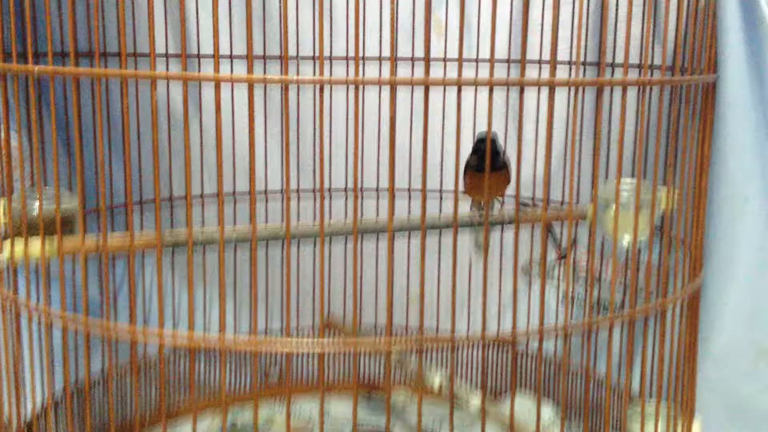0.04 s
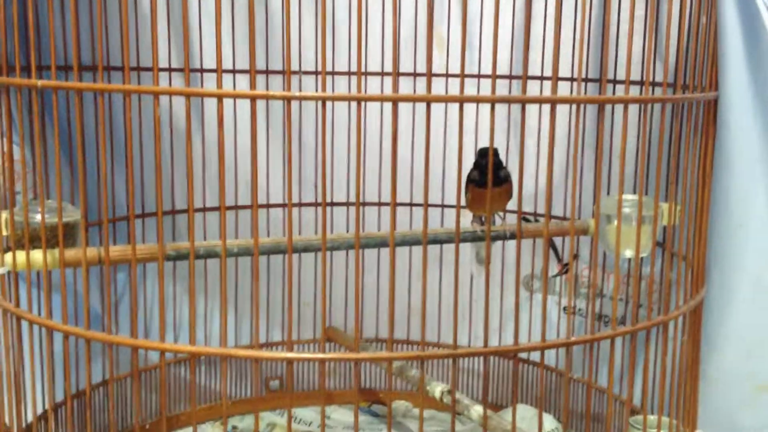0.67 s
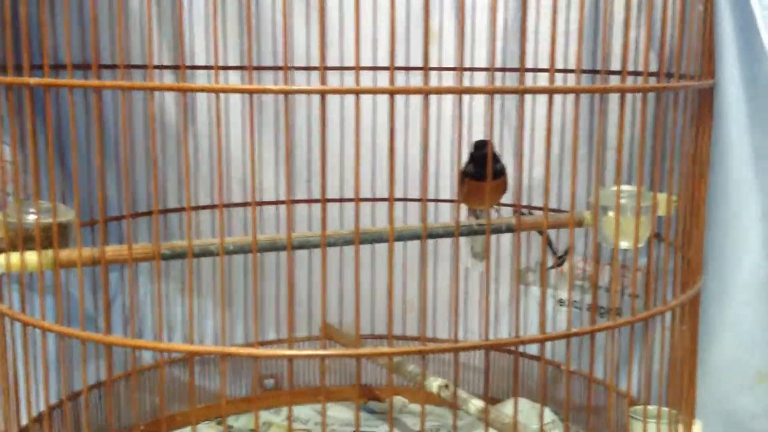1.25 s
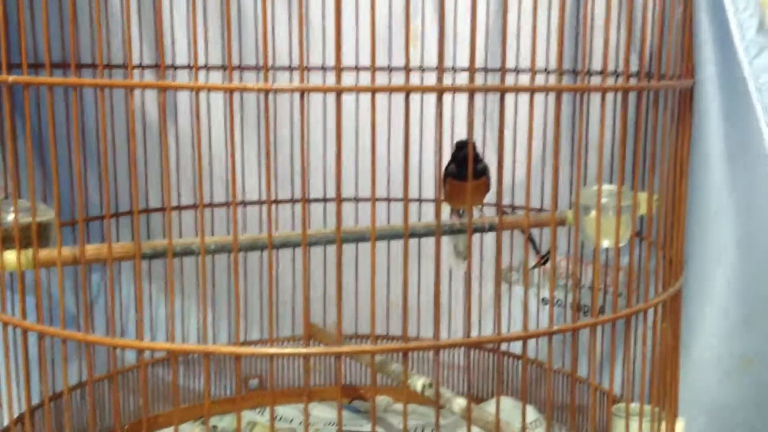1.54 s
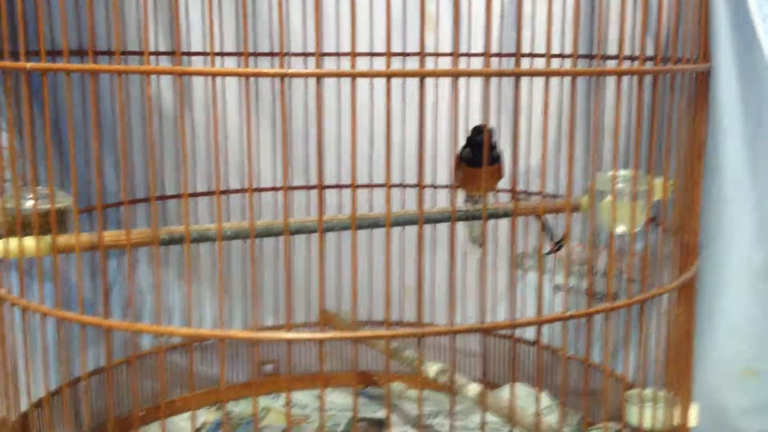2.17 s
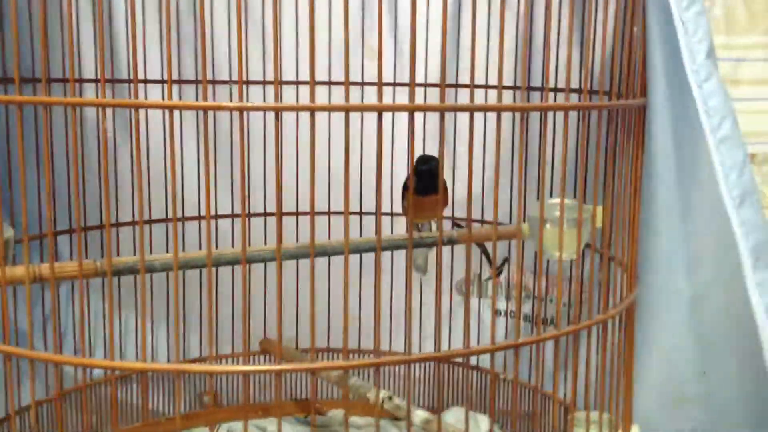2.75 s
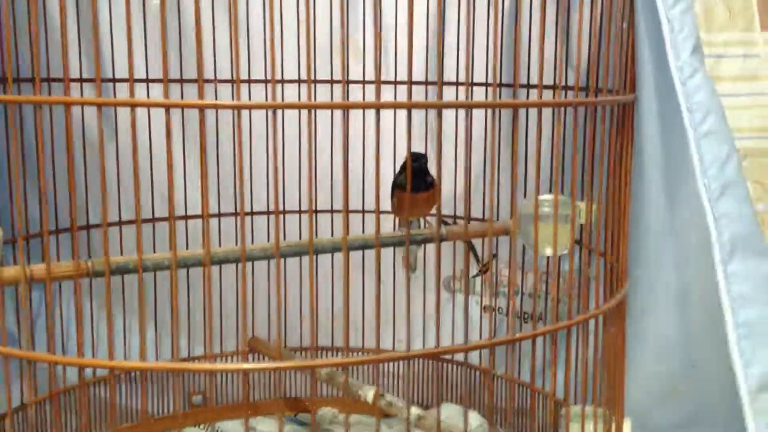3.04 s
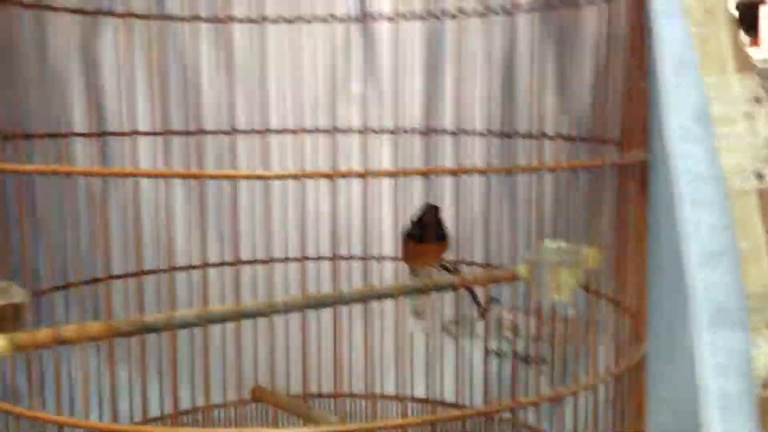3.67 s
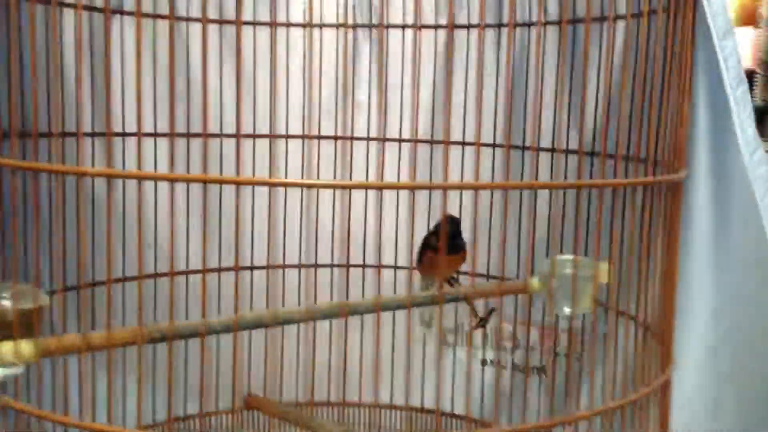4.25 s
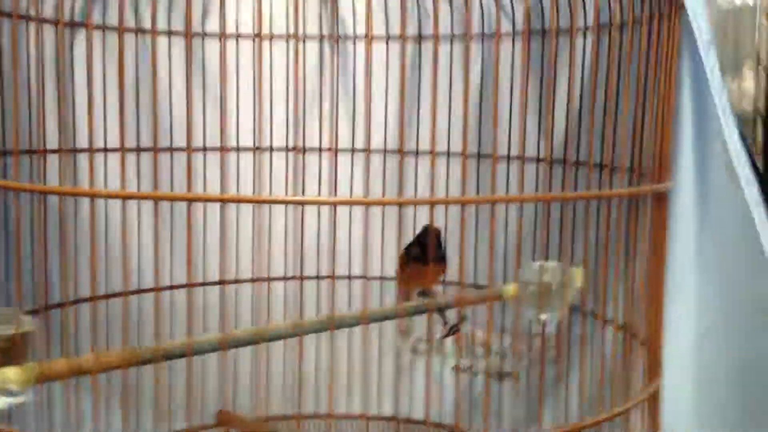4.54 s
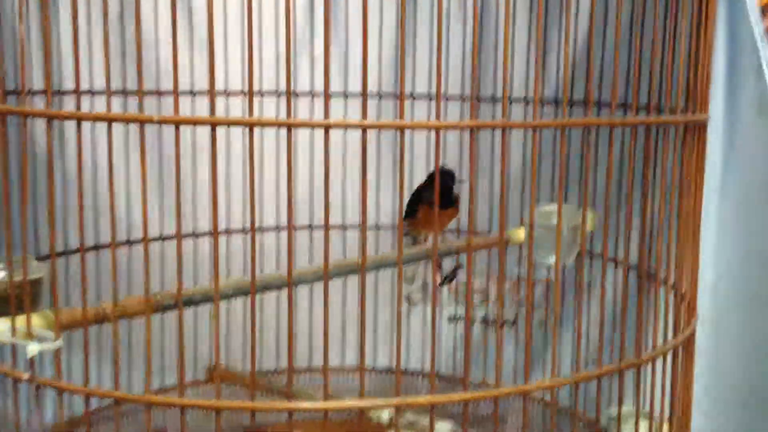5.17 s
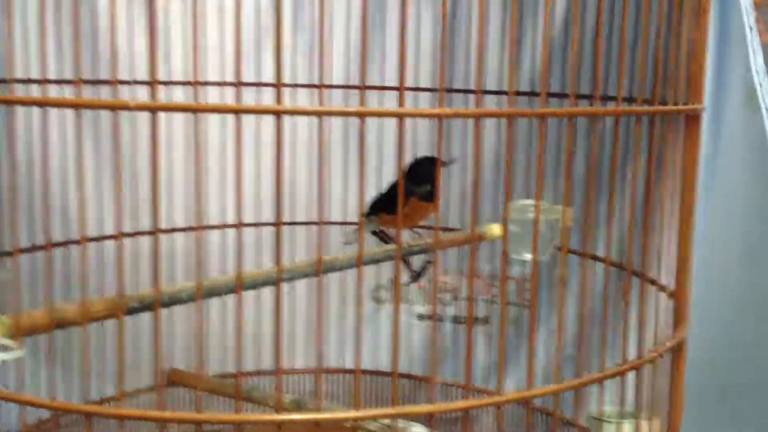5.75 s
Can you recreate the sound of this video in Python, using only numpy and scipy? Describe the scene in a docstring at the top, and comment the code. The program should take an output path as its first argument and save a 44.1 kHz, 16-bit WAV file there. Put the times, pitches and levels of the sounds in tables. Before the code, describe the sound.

In a hard-walled room, a nearby songbird in a cage gives quick rising and falling whistles, mixed with high squeaks, buzzes and small beak clicks. It pauses briefly, then resumes with a reedy falling call and a rapid chattering phrase while soft thuds and faint rustling gather behind it. It finishes with a quieter, wavering whistle. A short echo smears each note over low room air.

```python
"""A caged shama sings a metre or two away in a hard-walled room that smears each glide.
Its vibrating syrinx opens with a thin slide, a squeak, short whistles and a nasal buzz, then slurs
pure whistles around a husky warble. After a lull come a second squeak, a reedy falling call and a
busy run of whistles, buzz and chatter, as soft bumps gather and the low rumble and faint rustle swell.
A long fluttering whistle and one falling note close the song. Small clicks dot it along the way."""
import sys
import numpy as np
from scipy import signal
from scipy.fft import rfft, irfft
from scipy.io import wavfile
from scipy.ndimage import uniform_filter1d

SR = 44100
rng = np.random.default_rng(int(sys.argv[2]) if len(sys.argv) > 2 else 0)


def wav_out(sig):
    """Save sig, one row per channel (or a flat mono array), as 16-bit PCM at SR to the path in sys.argv[1]."""
    wavfile.write(sys.argv[1], SR, np.round(np.clip(np.atleast_2d(sig).T, -1, 1) * 32767).astype(np.int16))


N = 260631
TIME = np.arange(N) / SR

# Sliding whistles: start_s, length_s, peak_after_s, level_db, from_hz, to_hz, halfway_after_s, slide_s
SLIDES = [ (0.093, 0.1, 0.12, -29, 3680, 4530, 0.049, 0.02),
          (1.204, 0.14, 0.11, -11.5, 1960, 3301, 0.029, 0.017),
          (1.381, 0.076, 0.041, -17.5, 2560, 1270, 0.065, 0.014),
          (1.863, 0.13, 0.086, -13.5, 2300, 3510, 0.093, 0.024),
          (2.117, 0.029, 0.034, -21, 1977, 2402, 0.021, 0.0077),
          (2.144, 0.048, 0.025, -16.5, 2328, 1270, 0.046, 0.0096),
          (2.203, 0.065, 0.052, -18, 1508, 1645, 0.041, 0.0098),
          (3.346, 0.048, 0.032, -24, 2920, 3636, 0.016, 0.0089),
          (3.706, 0.041, 0.038, -21.5, 2315, 3450, 0.028, 0.015),
          (4.184, 0.13, 0.11, -14, 2198, 3311, 0.05, 0.011),
          (4.384, 0.075, 0.045, -18, 2650, 1926, 0.042, 0.014)]
# Whistles that drop onto a note: start_s, length_s, peak_after_s, level_db, from_hz, to_hz
DROPS = [ (0.667, 0.045, 0.032, -19, 2708, 2530), (0.713, 0.088, 0.04, -16.5, 2680, 2419),
         (1.021, 0.052, 0.033, -11, 3016, 2656), (3.595, 0.033, 0.017, -20, 2835, 2655),
         (3.652, 0.078, 0.013, -13.5, 2723, 2646), (3.97, 0.08, 0.024, -18.5, 3102, 2867),
         (4.439, 0.079, 0.044, -21.5, 1795, 1667), (5.768, 0.13, 0.036, -30.5, 3280, 1793)]
# Thin squeaks: start_s, length_s, pitch_hz, level_db
SQUEAKS = [(0.384, 0.068, 6280, -16), (3.175, 0.057, 6202, -16.5)]
# Nasal buzzes: start_s, length_s, peak_after_s, level_db, from_hz, to_hz, brightness_db
BUZZES = [(0.775, .25, 0.097, -30, 2015, 1976, -5), (3.715, 0.26, 0.2, -30.5, 2053, 2180, -4.5)]
# Hoarse chatter, with one faint 5 kHz second voice (3.728 s) sounding under the second buzz: start_s, length_s,
# peak_after_s, level_db, from_hz, to_hz, flutter_share_of_pitch
CHATTER = [ (0.149, 0.088, 0.014, -45.5, 1820, 1768, 0.052), (0.867, 0.061, 0.015, -33, 3844, 3650, 0.02),
           (2.842, 0.039, 0.0061, -42.5, 1694, 1770, 0.025), (2.847, 0.14, 0.062, -51.5, 4910, 3540, 0.046),
           (3.495, 0.13, 0.08, -30.5, 2867, 2480, 0.14), (3.728, 0.32, 0.04, -48.5, 4900, 4960, 0.011),
           (4.069, 0.12, 0.018, -32.5, 3680, 3650, 0.012), (4.141, 0.1, 0.079, -35, 3360, 3095, 0.1),
           (5.116, 0.13, 0.098, -46.5, 1555, 1675, 0.05), (5.167, 0.067, 0.025, -44.5, 2060, 1960, 0.043),
           (5.217, 0.33, 0.36, -42.5, 1920, 1955, 0.025)]
# Contours of the husky warble and the reedy call: time_s, pitch_hz, level_db
WARBLE = [(1.55, 2167, -26), (1.575, 2217, -13), (1.597, 2192, -19.5), (1.622, 1940, -18.5),
          (1.636, 2310, -32), (1.66, 2044, -48.5), (1.685, 2072, -19), (1.718, 2352, -28.5),
          (1.765, 2275, -21.5), (1.788, 2214, -14), (1.803, 2020, -26.5), (1.825, 2150, -30.5),
          (1.88, 2373, -20)]
REED = [(3.283, 2850, -39.5), (3.305, 1930, -39), (3.345, 1503, -37), (3.41, 1292, -39), (3.53, 1171, -40),
        (3.575, 1305, -37), (3.595, 1290, -31)]
# Contour of the long fluttering whistle: time_s, pitch_hz, level_db, dip_share_of_pitch
FLUTTER = [(5.235, 973, -40, 0.14), (5.264, 1257, -36, 0.074), (5.3, 1276, -41, 0.025),
           (5.318, 1542, -24, 0.051), (5.345, 1553, -44.5, 0.22), (5.392, 1555, -31, 0.32),
           (5.415, 1737, -32, 0.11), (5.53, 1699, -35.5, 0.4), (5.6, 1758, -29.5, 0.18),
           (5.68, 1766, -36, 0.15), (5.745, 1722, -48, 0.069)]

# Overtone colour of each voice, against its fundamental: frequency_hz, gain_db
HIGH_SLIDE_TONE = [(4600, -42.5), (6500, -28), (7600, -37.5), (9600, -34.5), (12500, -42.5)]
LOW_SLIDE_TONE = [(3100, -40.5), (4800, -33.5), (6300, -41), (8200, -35), (9800, -32.5), (12000, -42)]
WHISTLE_TONE = [(2500, -24), (5200, -40), (7800, -28), (10000, -49)]
SQUEAK_TONE = [(12500, -11.5)]
UNDERTONE_TONE = [(6200, -9), (9400, -3.5), (12500, -23.5)]
BUZZ_TONE = [(4100, 7), (6100, -12.5), (8300, -0.5), (10200, -24), (13000, -28)]
WARBLE_TONE = [(4500, -38.5), (6500, -44), (9000, -31.5), (11000, -40.5)]
REED_TONE = [(2400, 0.5), (3600, -10.5), (4300, -14.5), (8000, -36.5)]
FLUTTER_TONE = [(4700, -38.5), (7000, -58), (9000, -20.5), (11000, -45)]

# Beak snaps and scratchy note onsets: start_s, peak_db, centre_hz, decay_s
BEAK_CLICKS = [(.401, -28.5, 6660, 0.004), (1.563, -33.5, 4900, 0.067), (3.196, -27.5, 5950, 0.0037)]
# Soft low bumps: start_s, peak_db
BUMPS = [(0.555, -33), (2.848, -37), (3.341, -31), (3.448, -27), (3.573, -25), (3.662, -29), (4.082, -30),
         (4.151, -33.5), (4.458, -31), (5.137, -37.5)]
# Dry, close ticks: start_s, peak_db, centre_hz
TICKS = [(1.095, -37.5, 428), (3.017, -50, 2000), (3.074, -51, 7900), (3.574, -36, 6000),
         (5.183, -51, 8000)]
# Reverb time of the room: frequency_hz, t60_s
ROOM_DECAY = [(300, 0.052), (1500, 0.47), (2700, 0.39), (6500, 0.35), (13000, 0.27)]
# Colours of the background beds: frequency_hz, gain_db
AIR_COLOUR = [(30, -43), (140, -3.5), (350, -11), (1600, -18.5), (2500, -32), (15000, -49.5)]
RUMBLE_COLOUR = [(40, -23.5), (130, 2), (490, 2), (650, -4), (1050, -6), (2200, -53)]
RUSTLE_COLOUR = [(500, -16.5), (1500, 9), (7500, 1), (15000, -8)]
# Fader moves of the beds: time_s, level_db
RUMBLE_FADER = [(.3, -47.5), (1.6, -59), (2.7, -51), (3.1, -55), (3.65, -43), (4.6, -45), (5.3, -52)]
RUSTLE_FADER = [(2.3, -65), (2.8, -70.5), (3.5, -60.5), (4.3, -52), (4.8, -63.5), (4.92, -68), (5.3, -58)]


def song():
    """The lead: all the bird's voices, dry."""
    warble = syrinx([WARBLE], WARBLE_TONE, jitter=0.016, jitter_hz=138.3, rasp=0.45)
    long_whistle = syrinx([FLUTTER], FLUTTER_TONE, jitter=0.0191, jitter_hz=200,
                          flutter_hz=41.1, uneven=0.2056, throb=0.71, dip_sharpness=3.1)
    reedy_call = syrinx([REED], REED_TONE, jitter=0.018, jitter_hz=150, rasp=0.45)
    return drops() + slides() + squeaks() + buzzes() + chatter() + warble + reedy_call + long_whistle


def syrinx(notes, tone, jitter, jitter_hz, bright_db=0, rasp=0, flutter_hz=0, uneven=0,
           throb=0, dip_sharpness=0, glint_db=0, glint_hz=25, open_s=0):
    """A vibrating membrane glides through each note; a fast flutter can swing its pitch and strength."""
    out = np.zeros(N)
    for rows in notes:  # time_s, pitch_hz, level_db and, optionally, flutter_share_of_pitch
        times, *columns = np.transpose(rows)
        t = np.arange(times[0], times[-1], 1 / SR)
        pitch, level_db, *flutter = (np.interp(t, times, column) for column in columns)
        pitch = pitch * (1 + jitter * drift(len(t), jitter_hz))
        strength = gain_of(level_db) * signal.windows.tukey(len(t), min(0.0027 * SR / len(t), 1))
        if flutter:
            depth = flutter[0]
            beat_hz = flutter_hz * (1 + uneven * drift(len(t), flutter_hz))
            beat = np.sin(2 * np.pi * np.cumsum(beat_hz) / SR)
            if dip_sharpness:  # the note holds, and each beat is a brief dip below it
                beat = -((1 - beat) / 2) ** dip_sharpness
            pitch = pitch * (1 + depth * beat)
            tremolo = throb * beat * (1 if dip_sharpness else depth / depth.max())
            strength = strength * evened(1 + tremolo)  # louder at the top of each swing
        phase = 2 * np.pi * np.cumsum(pitch) / SR
        rough_phase = phase + rasp * drift(len(t), 280)  # uneven closures blur the overtones
        overtones = np.zeros(len(t))
        for k in range(2, 10):
            flare_db = glint_db * drift(len(t), glint_hz) if glint_db else 0
            weight = gain_of(curve_at(tone, k * pitch) + flare_db) * (k * pitch < SR / 2)
            overtones += weight * np.sin(k * rough_phase)
        fundamental = np.sin(phase)
        if open_s:  # the beak opens and shifts the weight to the overtones
            opening = np.minimum((t - times[0]) / open_s, 1) ** 3
            fundamental, overtones = fundamental * (1 - opening / 2), overtones * opening
        add(out, times[0], strength * evened(fundamental + gain_of(bright_db) * overtones))
    return out


def envelope(start_s, length_s, peak_s, level_db, rise_db, fall_db, attack_s=0.015, release_s=0.0039):
    """A note fades in, swells, eases off and stops. Gives scene time, note time and level in dB."""
    t = np.linspace(0, length_s, 200)
    peak_s = np.clip(peak_s, 0.05 * length_s, 0.95 * length_s)
    swell_db = -np.interp(t, [0, peak_s, length_s], [rise_db, 0, fall_db])
    fades = np.clip(np.minimum(t / attack_s, (length_s - t) / release_s), 1e-3, 1)
    return start_s + t, t, level_db + swell_db + 20 * np.log10(fades)


def slides(register_hz=2800, thin_above_hz=4000):
    """Pure whistles slur from note to note along an S-curve; the target pitch sets their colour."""
    out = np.zeros(N)
    for *shape, from_hz, to_hz, halfway_s, slide_s in SLIDES:
        times, t, db = envelope(*shape, rise_db=14.5, fall_db=6.5)
        pitch = from_hz + (to_hz - from_hz) / (1 + np.exp((halfway_s - t) / slide_s))
        tone = HIGH_SLIDE_TONE if to_hz > register_hz else LOW_SLIDE_TONE
        out += syrinx([np.c_[times, pitch, db]], tone, jitter=0.013, jitter_hz=120,
                      bright_db=15.5 * (to_hz > thin_above_hz), rasp=0.2, glint_db=3.0)
    return out


def drops(settle_s=0.038):
    """Whistles that start high and settle toward their note."""
    notes = []
    for *shape, from_hz, to_hz in DROPS:
        times, t, db = envelope(*shape, rise_db=14.5, fall_db=7.5)
        pitch = to_hz + (from_hz - to_hz) * np.exp(-t / settle_s)
        notes.append(np.c_[times, pitch, db])
    return syrinx(notes, WHISTLE_TONE, jitter=0.0075, jitter_hz=115, rasp=0.067)


def squeaks(break_s=0.016, swell_s=0.0057, undertone_db=-18.5, flutter_depth=0.035):
    """A high, steady tone breaks, adding a scratch just below it and an undertone an octave down."""
    tones, undertones, scratches = [], [], []
    for start_s, length_s, pitch_hz, level_db in SQUEAKS:
        times, t, db = envelope(start_s, length_s, peak_s=0.042, level_db=level_db,
                                rise_db=5, fall_db=19.5)
        pitch = np.full_like(t, pitch_hz)
        voice_break = np.clip((t - break_s) / swell_s, 1e-3, 1)
        under_db = db + undertone_db + 20 * np.log10(voice_break)
        tones.append(np.c_[times, pitch, db])
        undertones.append(np.c_[times, pitch / 2, under_db, np.full_like(t, flutter_depth)])
        scratches.append(np.c_[times, pitch - 250, under_db + 3.5])
    return (syrinx(tones, SQUEAK_TONE, jitter=0.012, jitter_hz=193, rasp=0.16)
            + syrinx(scratches, SQUEAK_TONE, jitter=0.035, jitter_hz=411)
            + syrinx(undertones, UNDERTONE_TONE, jitter=0.022, jitter_hz=301,
                     flutter_hz=113.4, uneven=0.2))


def buzzes(flutter_depth=0.048, build_s=0.13):
    """A nasal tone starts dull and clean, then brightens and builds to a rattle."""
    out = np.zeros(N)
    for *shape, from_hz, to_hz, bright_db in BUZZES:
        times, t, db = envelope(*shape, rise_db=6, fall_db=3.5)
        pitch = np.linspace(from_hz, to_hz, len(t))
        rattle = flutter_depth * np.minimum(t / build_s, 1) ** 4
        out += syrinx([np.c_[times, pitch, db, rattle]], BUZZ_TONE, jitter=0.011, jitter_hz=206,
                      bright_db=bright_db, flutter_hz=91.7, uneven=0.16, throb=0.17, open_s=0.062)
    return out


def chatter():
    """Straight glides made hoarse by a fast, uneven flutter."""
    notes = []
    for *shape, from_hz, to_hz, depth in CHATTER:
        times, t, db = envelope(*shape, rise_db=5, fall_db=13.5)
        pitch = np.linspace(from_hz, to_hz, len(t))
        notes.append(np.c_[times, pitch, db, np.full_like(t, depth)])
    return syrinx(notes, WHISTLE_TONE, jitter=0.043, jitter_hz=350, bright_db=4,
                  flutter_hz=145, uneven=0.24)


def knocks(rows, spread):
    """Each contact is a short, dying noise burst around one broad resonance."""
    out, t = np.zeros(N), TIME[:SR // 4]
    for start_s, peak_db, centre_hz, decay_s in rows:
        band_hz = np.clip([centre_hz / (1 + spread), centre_hz * (1 + spread)], 20, SR / 2 - 100)
        hit = rng.standard_normal(len(t)) * np.exp(-t / decay_s)
        burst = signal.sosfilt(signal.butter(2, band_hz, "band", fs=SR, output="sos"), hit)
        add(out, start_s, gain_of(peak_db) * burst / abs(burst).max())
    return out


def room(dry, direct_db, early_db, tail_db, shadow_hz, echoes_per_s=4000):
    """Direct sound, three echoes off near surfaces, then a dense tail that rings longest in the mids."""
    echoes = rng.choice([-1., 1.], SR) * (rng.random(SR) < echoes_per_s / SR)
    hz, t, spectrum = signal.stft(echoes, SR, nperseg=256)
    decay = gain_of(-60 * t / curve_at(ROOM_DECAY, hz)[:, None])
    tail = signal.istft(spectrum * decay, SR, nperseg=256)[1][:SR]
    tail = tail * np.minimum(TIME[:SR] / 0.009, 1)
    near = gain_of(direct_db) * signal.unit_impulse(SR)
    for delay_s in [.0052, .0125, .033]:
        near[round(delay_s * SR)] += gain_of(early_db)
    # the beak beams its treble past the microphone, so that arrives mostly by way of the walls
    near = signal.lfilter(*signal.butter(1, shadow_hz, fs=SR), near)
    return signal.oaconvolve(dry, near + gain_of(tail_db) * tail / np.linalg.norm(tail))[:N]


def background():
    """The bed: steady room air, with a distant rumble and a faint, fitful rustle that swell and fade."""
    rumble = patchy(noise(RUMBLE_COLOUR), patch_db=4.5, width_hz=45, patch_s=0.2)
    rumble *= gain_of(np.interp(TIME, *np.transpose(RUMBLE_FADER)))
    rustle = patchy(noise(RUSTLE_COLOUR), patch_db=3.5, width_hz=2600, patch_s=0.035)
    rustle *= gain_of(np.interp(TIME, *np.transpose(RUSTLE_FADER)))
    air = gain_of(-54.5) * noise(AIR_COLOUR)
    return air + rumble + rustle


def patchy(bed, patch_db, width_hz, patch_s):
    """Lets bands of a steady noise swell and fade at random."""
    hz, t, spectrum = signal.stft(bed, SR, nperseg=2048, noverlap=1536)
    swells = rng.standard_normal(spectrum.shape[::-1])
    swells = uniform_filter1d(swells, max(round(patch_s / t[1]), 1), axis=0)
    swells = evened(uniform_filter1d(swells, max(round(width_hz / hz[1]), 1), axis=1))
    spectrum *= gain_of(patch_db * swells.T)
    return evened(signal.istft(spectrum, SR, nperseg=2048, noverlap=1536)[1][:N])


def noise(colour):
    """Steady noise of rms 1 with the given colour."""
    eq = gain_of(curve_at(colour, np.fft.rfftfreq(N, 1 / SR)))
    return evened(irfft(rfft(rng.standard_normal(N)) * eq, N))


def drift(size, rate_hz):
    """Random wobble of rms about 1, rolled off above the rate."""
    hz = np.fft.rfftfreq(SR, 1 / SR)
    return evened(irfft(rfft(rng.standard_normal(SR)) / (1 + (hz / rate_hz) ** 4)))[:size]


def curve_at(points, hz):
    """Reads a curve on a log-frequency axis."""
    point_hz, value = np.transpose(points)
    return np.interp(np.log(hz + 1), np.log(point_hz + 1), value)


def gain_of(db):
    """Decibels to amplitude."""
    return 10 ** (np.asarray(db) / 20)


def evened(x):
    """Scales to rms 1."""
    return x / np.sqrt(np.mean(x ** 2) + 1e-20)


def add(mix, start_s, sound):
    """Lays a sound into the mix."""
    part = mix[max(round(start_s * SR), 0):][:len(sound)]
    part += sound[:len(part)]


def scene():
    """The mono mix: bird and beak clicks in the room, over dry bumps, ticks and the bed."""
    bird = song() + knocks(BEAK_CLICKS, spread=0.21)
    bird_in_room = room(bird, direct_db=-4, early_db=-14, tail_db=-2.5, shadow_hz=5670)
    bumps = knocks([(*row, 165, .035) for row in BUMPS], spread=0.34)  # 165 Hz thuds, 35 ms decay
    ticks = knocks([(*row, .002) for row in TICKS], spread=0.46)  # 2 ms decay
    return (bird_in_room + bumps + ticks + background())[None]


def record(dry):
    """The microphone opens just after the start; a steep high cut trims the top."""
    open_s, fade_s, high_cut_hz = 0.12, 0.00081, 15400
    opened = dry * np.clip((TIME - open_s) / fade_s, 0, 1)
    high_cut = signal.firwin(511, high_cut_hz, window=("kaiser", 9), fs=SR)
    return signal.oaconvolve(opened, high_cut[None], "same")


dry = scene()
out = record(dry)
wav_out(out)
```